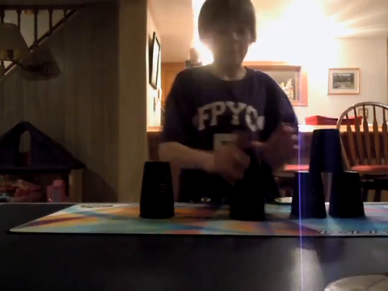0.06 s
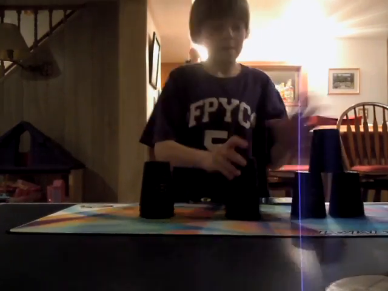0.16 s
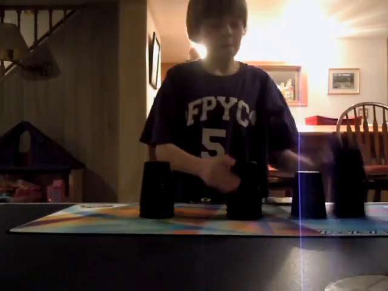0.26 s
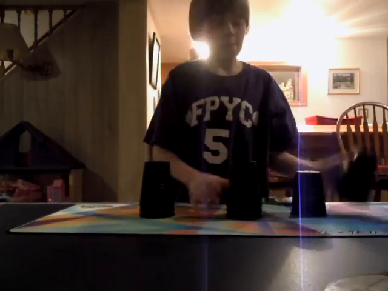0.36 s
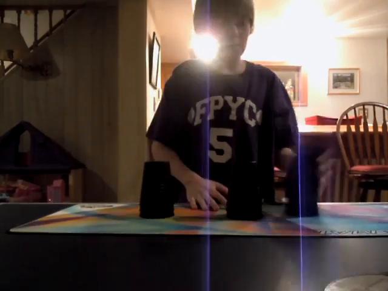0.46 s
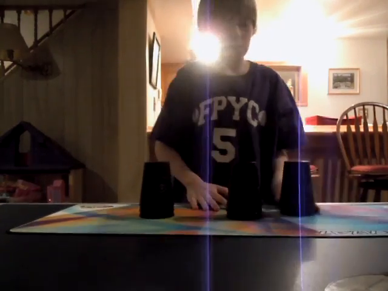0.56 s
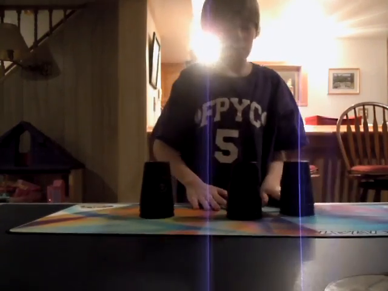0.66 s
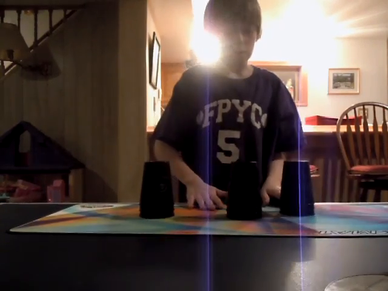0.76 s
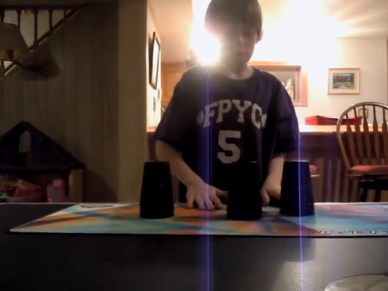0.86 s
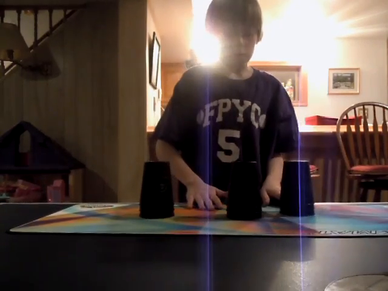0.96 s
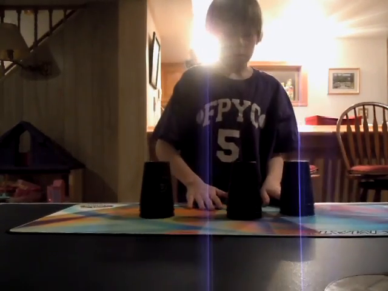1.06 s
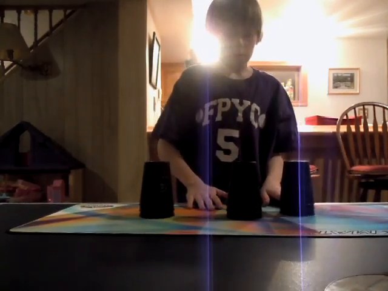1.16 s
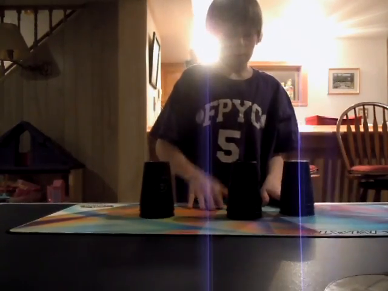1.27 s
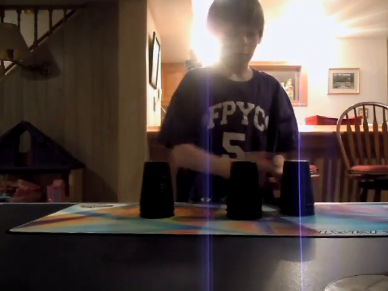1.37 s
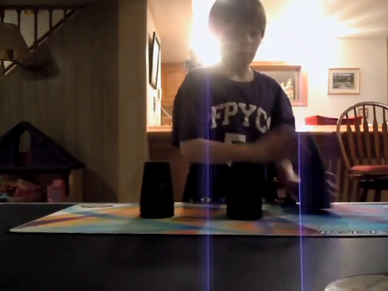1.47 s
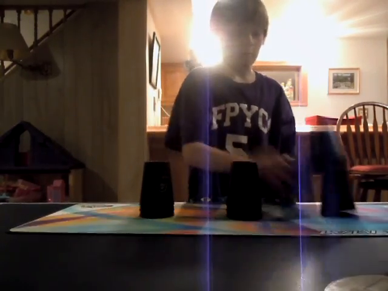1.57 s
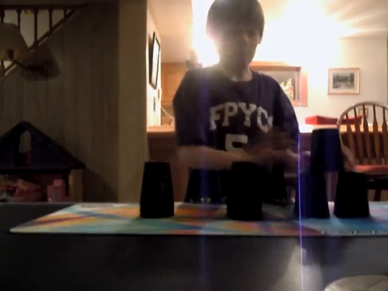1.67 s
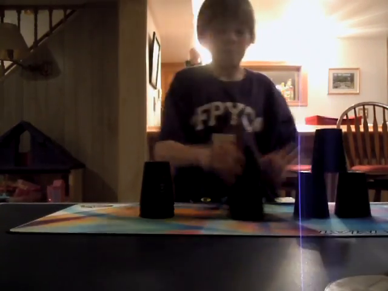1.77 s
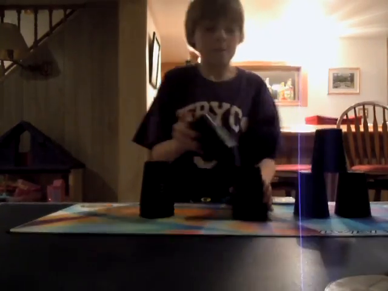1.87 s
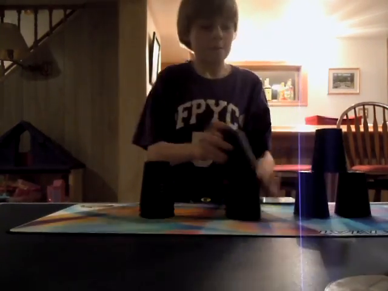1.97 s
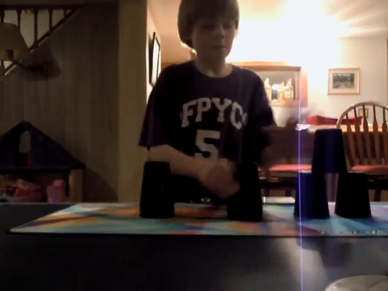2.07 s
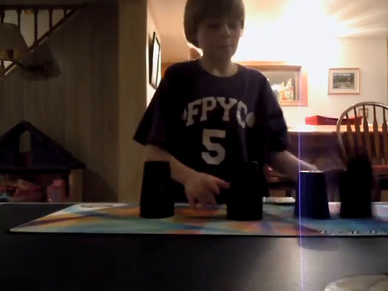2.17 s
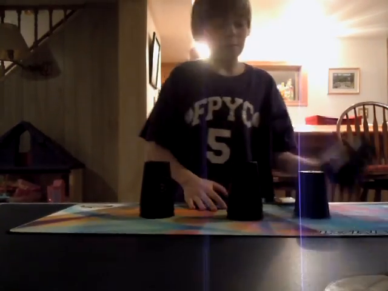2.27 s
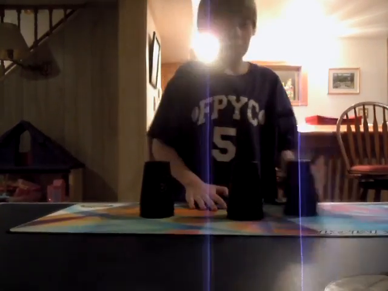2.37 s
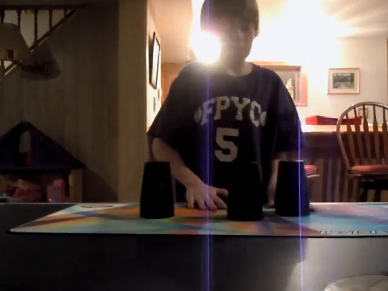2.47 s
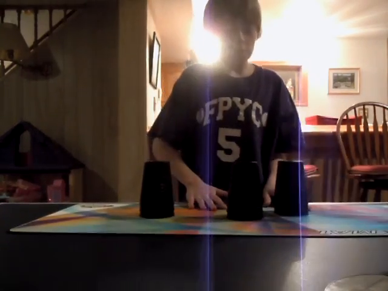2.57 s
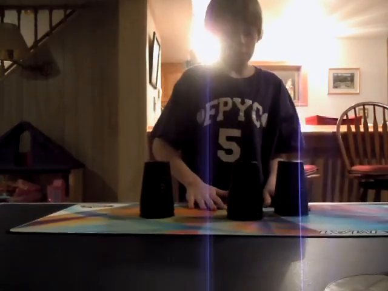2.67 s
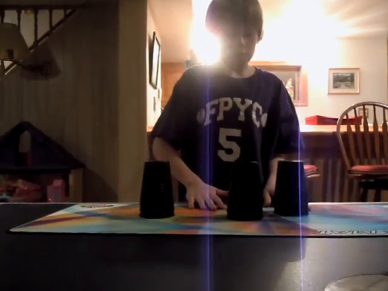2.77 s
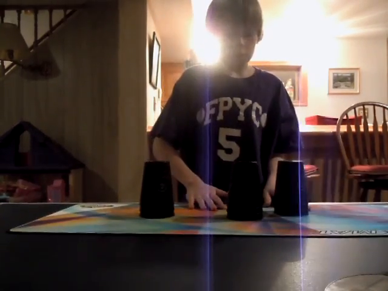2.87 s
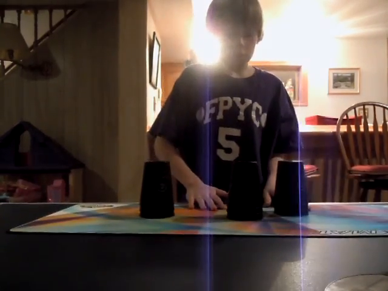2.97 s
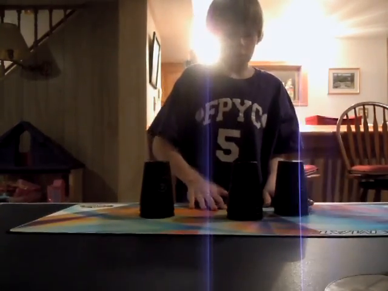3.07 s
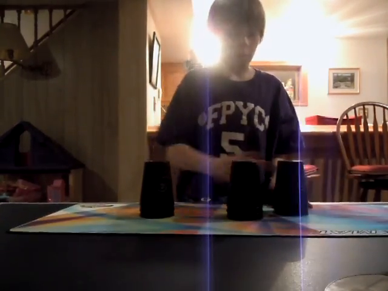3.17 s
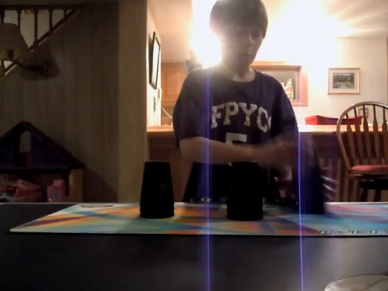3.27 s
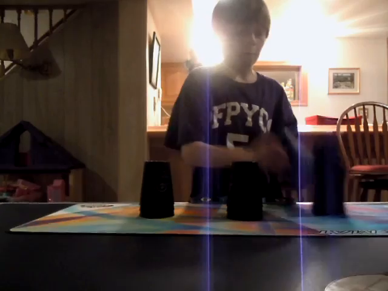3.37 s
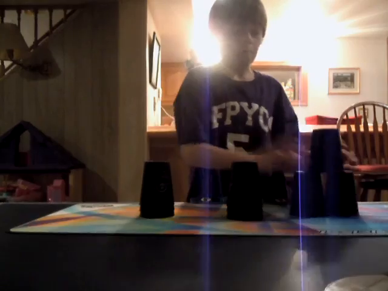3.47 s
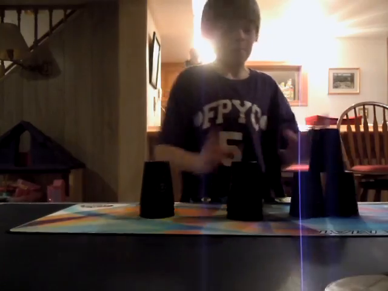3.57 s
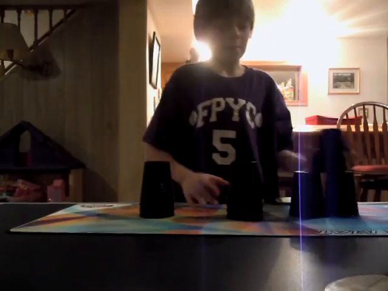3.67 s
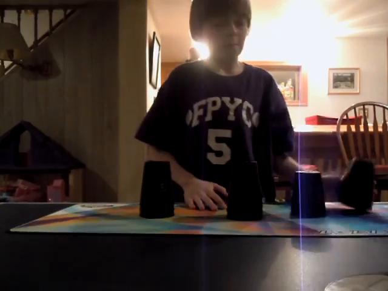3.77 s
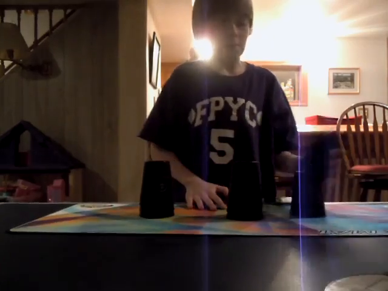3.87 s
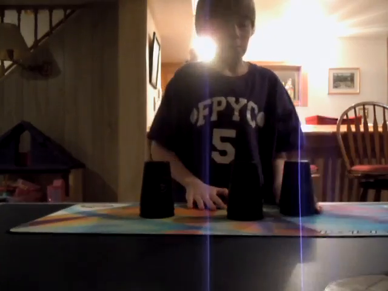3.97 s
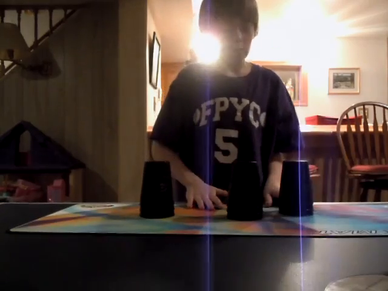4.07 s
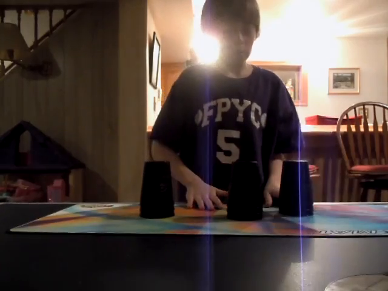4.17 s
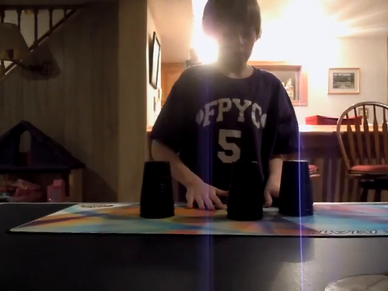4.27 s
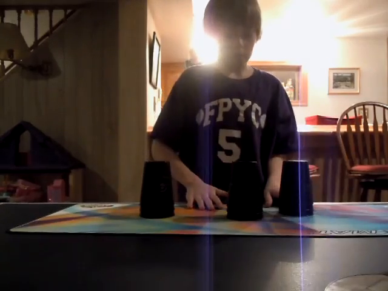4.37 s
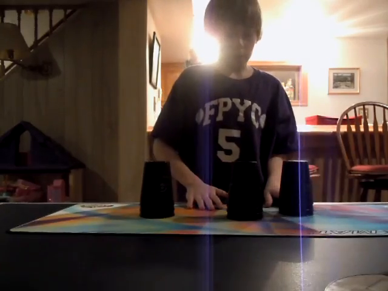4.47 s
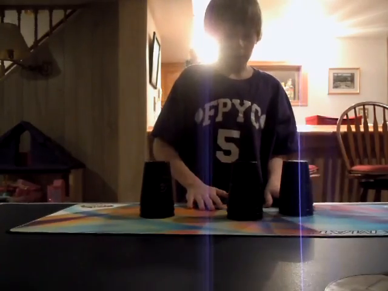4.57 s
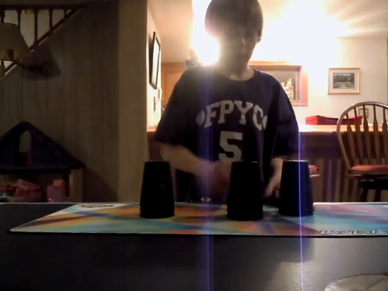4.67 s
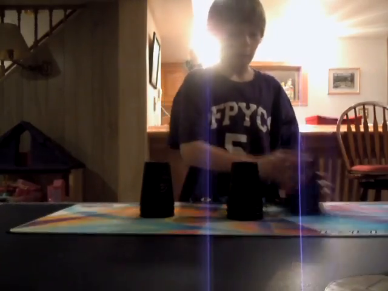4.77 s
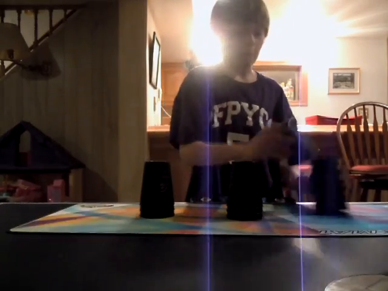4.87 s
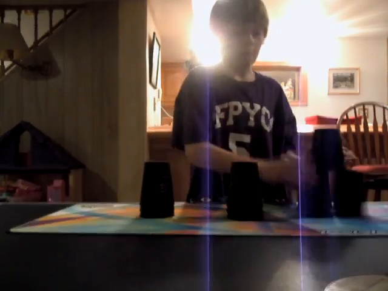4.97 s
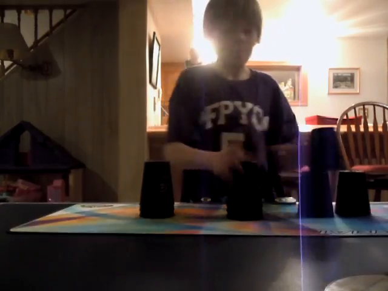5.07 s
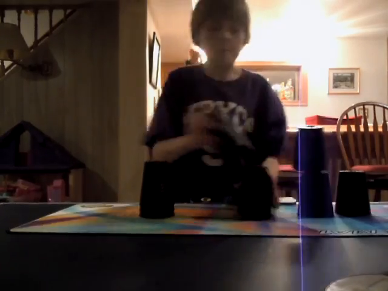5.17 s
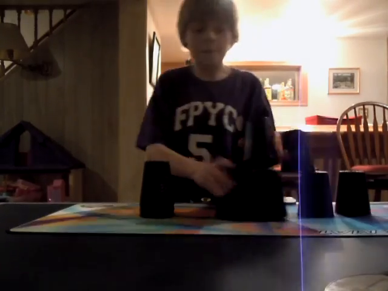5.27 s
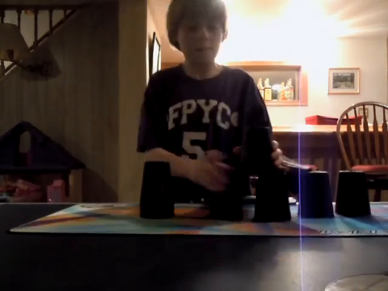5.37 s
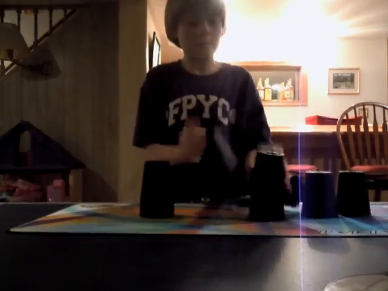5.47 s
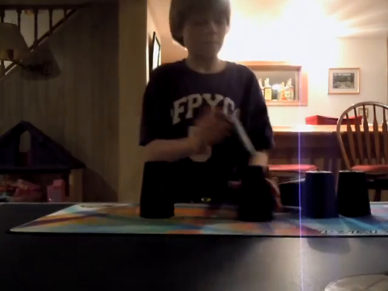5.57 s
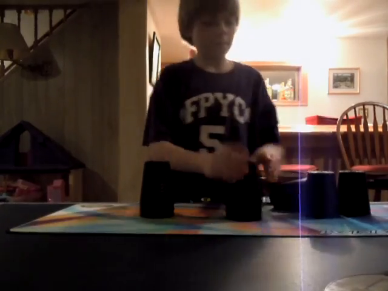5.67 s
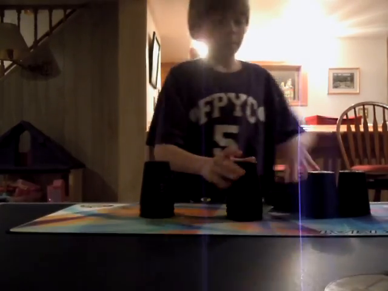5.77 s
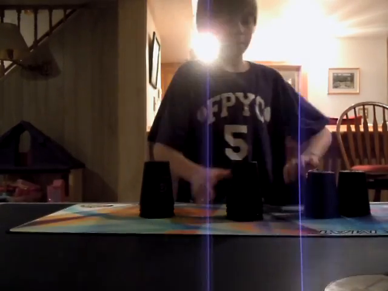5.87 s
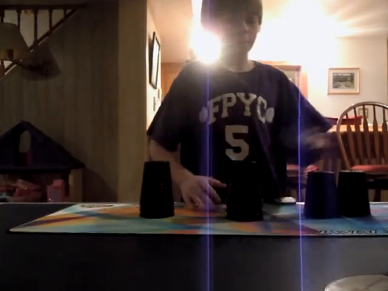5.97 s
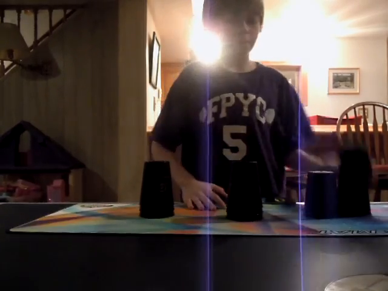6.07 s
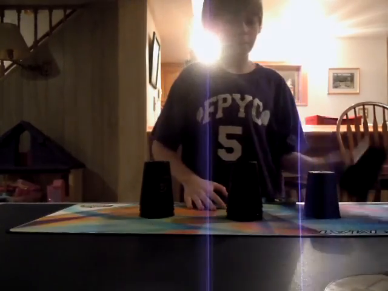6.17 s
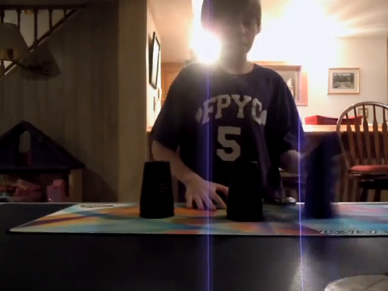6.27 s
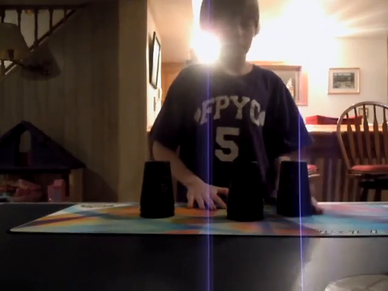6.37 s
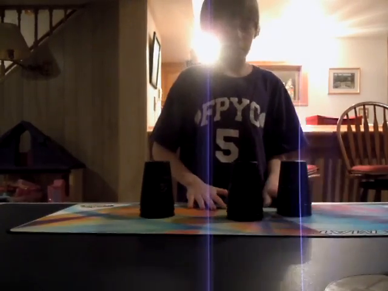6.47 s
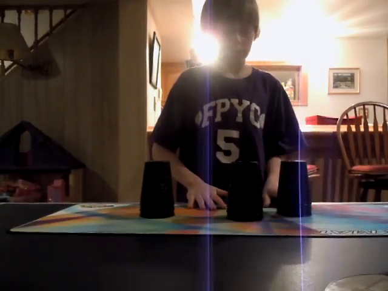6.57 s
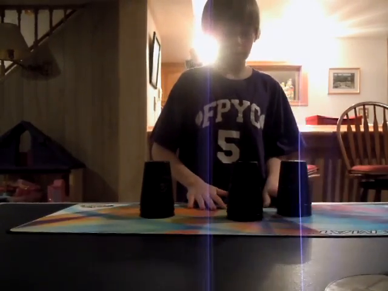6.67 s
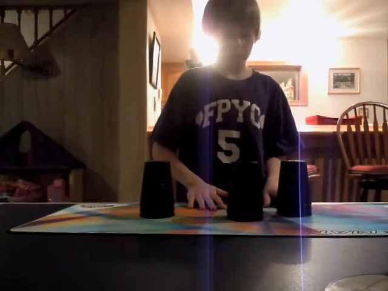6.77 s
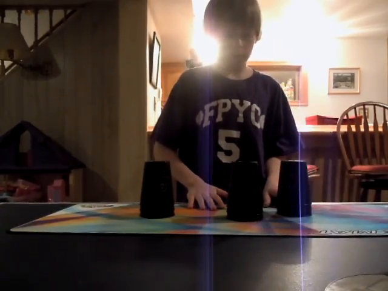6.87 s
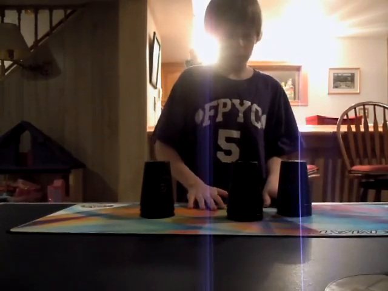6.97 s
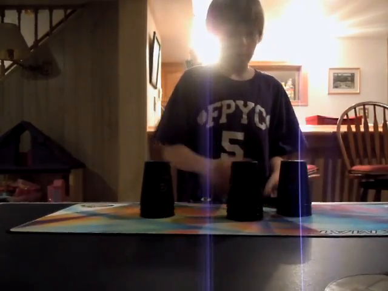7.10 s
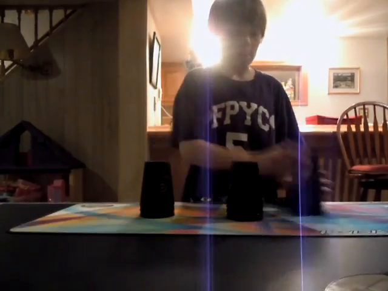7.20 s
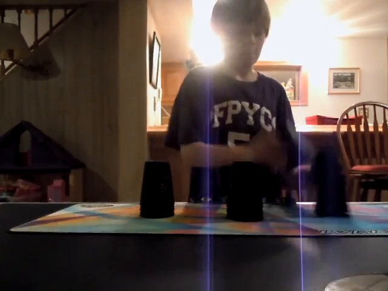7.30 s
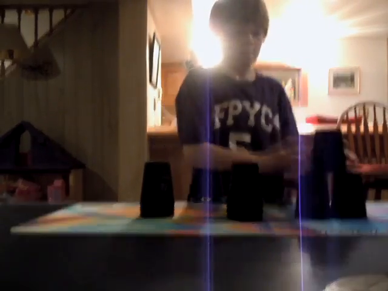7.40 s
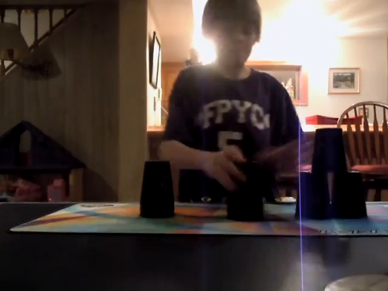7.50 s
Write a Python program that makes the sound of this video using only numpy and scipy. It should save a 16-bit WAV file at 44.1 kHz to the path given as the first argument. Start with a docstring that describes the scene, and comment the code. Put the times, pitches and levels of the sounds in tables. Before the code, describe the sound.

Hard plastic cups are stacked and unstacked in rapid bursts on a table mat, hollow knocks and sharp clacks separated by short near-silent pauses.

```python
"""A living room: on a mat on a table, hard plastic cups are stacked and unstacked in quick bursts.
Each full blow mixes a hollow note of trapped air, a ringing cup wall, a sharp rim crack and a thud in the table.
Cups rub with a noise made of tiny slips, the table sways at a low pitch, and the room adds fading echoes.
A camera stands on the same table, so close that the hardest knocks overload its microphone."""
import sys
import numpy as np
from scipy import signal
from scipy.fft import rfft, irfft, next_fast_len
from scipy.io import wavfile

SR = 44100
rng = np.random.default_rng(int(sys.argv[2]) if len(sys.argv) > 2 else 0)


def materialize(psi):
    """Save the field psi as 16-bit PCM at rate SR to the path in sys.argv[1].

    A 1-D psi becomes a single channel; in a 2-D psi each row is a channel.
    """
    bounded = np.clip(np.atleast_2d(psi).T, -1, 1)
    quanta = np.round(bounded * 32767).astype(np.int16)
    wavfile.write(sys.argv[1], SR, quanta)


N = 332514  # length of the scene in samples
LEAD = SR // 10  # samples made before the scene opens, so that earlier sounds can run into it
TIME = (np.arange(next_fast_len(LEAD + N + 2000)) - LEAD) / SR  # seconds; 0 is the opening
FREQS = np.fft.rfftfreq(len(TIME), 1 / SR)
AGE = np.arange(4096) / SR  # seconds since a blow
ATTACK = 265  # the first 6 ms of a blow, in samples


def amp(db):
    """Turns decibels into a gain."""
    return 10 ** (np.asarray(db) / 20)


def read(points, hz):
    """Reads a table between its rows, along straight lines over log frequency."""
    table_hz, value = np.transpose(points)
    return np.interp(np.log(hz + 1), np.log(table_hz + 1), value)


def unit(x):
    """Scales a sound to an average (rms) strength of 1."""
    return x / np.sqrt(np.mean(x ** 2) + 1e-20)


def struck(x):
    """Scales a blow so that its first 6 ms have an rms of 1."""
    return x / np.sqrt(np.mean(x[:ATTACK] ** 2) + 1e-20)


def add(mix, start_s, sound):
    """Mixes a sound in at a given time."""
    part = mix[max(0, LEAD + round(start_s * SR)):][:len(sound)]
    part += sound[:len(part)]


def colour(x, points):
    """Filters a sound to a given spectrum without smearing it backwards in time (minimum phase)."""
    size = len(AGE)
    hz = abs(np.fft.fftfreq(size, 1 / SR))
    log_gain = np.log(amp(read(points, hz)))
    taps = np.fft.ifft(np.exp(np.conj(signal.hilbert(log_gain)))).real
    return signal.oaconvolve(x, taps[:size // 2])[:len(x)]


def noise(points):
    """Makes steady noise of rms 1 with a given spectrum."""
    return unit(colour(rng.standard_normal(len(TIME)), points))


def ring(hz, t60, rise=0.00036):
    """One pure note that rises quickly, then falls by 60 dB in t60 seconds."""
    return np.sin(2 * np.pi * hz * AGE) * amp(-60 * AGE / t60) * (1 - np.exp(-AGE / rise))


# Colour of the steady hiss: frequency_hz, level_db
HISS_COLOUR = [(150, -29), (700, -38.5), (1800, -17), (4000, -22), (8000, -30), (12000, -32.5),
               (15000, -43)]


def hiss(hiss_db=-73, whine_db=-77, whine_hz=7880, whine_width_hz=60):
    """Faint steady hiss, plus noise in so narrow a band that it is heard as a fuzzy whine."""
    band = np.exp(-.5 * ((FREQS - whine_hz) / whine_width_hz) ** 2)
    whine = unit(irfft(rfft(rng.standard_normal(len(TIME))) * band, len(TIME)))
    return amp(hiss_db) * noise(HISS_COLOUR) + amp(whine_db) * whine


# How long the room rings: frequency_hz, t60_s
ROOM_T60 = [(100, .4), (400, 0.37), (1000, 0.4), (2000, 0.4), (4000, 0.4), (8000, 0.33), (14000, 0.45)]
# How strongly the room answers: frequency_hz, level_db
ROOM_SEND = [(100, 0.5), (400, -9.5), (1000, -8), (2000, -6.5), (4000, -11), (8000, -12.5), (14000, -21)]
# How alike the room tail is on left and right: frequency_hz, likeness (1 = the same)
ROOM_LIKENESS = [(100, .98), (600, .98), (1200, .88), (3000, .8), (8000, .65), (14000, .6)]


def tail(build_s=0.00067):
    """Many mixed echoes: fading noise, nearly alike at both microphone ports, that dies at each pitch's own rate."""
    hz, t, spectra = signal.stft(rng.standard_normal((2, SR * 2 // 3)), SR, nperseg=256)
    same = np.clip(read(ROOM_LIKENESS, hz), -1, 1)[:, None]
    spectra[1] = same * spectra[0] + np.sqrt(1 - same ** 2) * spectra[1]
    t60 = read(ROOM_T60, hz)[:, None]
    even_energy = np.sqrt(2 * np.log(1000) / (t60 * SR))  # a longer tail is not a stronger one
    spectra *= amp(read(ROOM_SEND, hz)[:, None] - 60 * t / t60) * even_energy
    response = signal.istft(spectra, SR, nperseg=256)[1]
    return response * np.minimum(np.arange(response.shape[1]) / (build_s * SR), 1)


def room(x, echo_db=-12, count=3):
    """Direct sound, one ceiling echo and three random tails, faded in turn so that blows do not all share one."""
    delay = SR * (.0068 + .0002 * np.sin(2 * np.pi * 1.3 * TIME))  # about 7 ms, drifting slightly
    source = np.arange(len(x)) - np.round(delay).astype(int)
    out = x + amp(echo_db) * x[np.maximum(source, 0)]
    for k in range(count):
        place = (TIME * 5 + k) % count
        share = np.sin(np.pi / 2 * np.minimum(place, 2))  # fades in and out, then rests
        out = out + signal.oaconvolve((x * share)[None], tail(), axes=1)[:, :len(TIME)]
    return out


# Colour of the rumble: frequency_hz, level_db
RUMBLE_COLOUR = [(12, -11.5), (26, 5), (45, -9), (90, -10), (130, -13), (200, -19), (350, -25), (600, -31),
                 (1200, -36), (4000, -75.5)]
# The table sways after a push: start_s, level_db, pitch_hz, t60_s
SWAYS = [(1.791, -23, 31.18, 0.86), (5.653, -20.5, 27.2, 0.92), (6.385, -17.5, 26.94, 0.55),
         (6.58, -30, 25.7, 0.95)]
# Colour of the juddering table legs: frequency_hz, level_db
JUDDER_COLOUR = [(30, -3.5), (60, -1), (130, -3), (220, -9.5), (450, -24.5), (2000, -35)]


def table(rise=0.014, judder_db=-15, rumble_db=-42.5, rumble_fade_db_per_s=31.5):
    """Low notes for the sway, noise for the legs, and a rumble of arms that shift around moves and rest between."""
    rest_s = np.min([abs(TIME - row[0]) for row in LANDINGS + NESTINGS + BUMPS], axis=0)
    out = amp(rumble_db - rumble_fade_db_per_s * rest_s) * noise(RUMBLE_COLOUR)
    t = np.arange(SR) / SR
    for start_s, db, hz, t60 in SWAYS:
        judder = amp(judder_db) * unit(colour(rng.standard_normal(SR), JUDDER_COLOUR))
        sway = np.sin(2 * np.pi * hz * t)
        add(out, start_s, amp(db - 60 * t / t60) * (1 - np.exp(-t / rise)) * (sway + judder))
    return out


def friction(spread_db):
    """Plastic on plastic: a dense train of tiny slips of uneven size."""
    slips_per_s = 5000
    size = amp(spread_db * np.minimum(rng.exponential(1, len(TIME)), 3))
    slips = rng.random(len(TIME)) < slips_per_s / SR
    return size * rng.standard_normal(len(TIME)) * slips


def stroke(length_s, db):
    """Pressure of one scrape: quick rise, hold, quick release."""
    return amp(db) * signal.windows.tukey(max(2, round(length_s * SR)), .25)


# Nested cups are drawn apart, with one quick pull on the way:
# start_s, pull_s, end_s, level_db (before the pull and the overall slide gain)
LIFTS = [(1.273, 1.47, 2.03, -51), (3.058, 3.29, 3.37, -44), (4.591, 4.843, 4.97, -50.5),
         (7.175, 7.257, 7.55, -46.5)]
# Rims and fingers scrape as loose cups are pushed together; the last, faint row is a soft brush of
# hands on cups: start_s, end_s, level_db
SCRAPES = [(0, 0.238, -40), (1.775, 1.903, -41), (5.279, 5.319, -29), (5.391, 5.708, -45.5),
           (6.085, 6.174, -36.5), (6.164, 6.283, -48), (6.555, 7.213, -57.5)]
# Colour of smooth sliding, shaped by the gap between two cups: frequency_hz, level_db
SLIDE_COLOUR = [(200, -23), (1000, -10.5), (1700, -9), (2450, 2.5), (3500, -12), (4900, -6.5), (5800, -6),
                (7000, 2), (7900, 3), (8500, -6.5), (9500, -2.5), (11000, -17), (14000, -19.5)]
# Colour of a scrape, from the hollow of the cups up to the hiss of the rims: frequency_hz, level_db
SCRAPE_COLOUR = [(150, -8.5), (350, -4), (700, 4), (1100, -5.5), (1500, -21.5), (2500, -10.5), (4300, -13),
                 (6000, -6), (8000, -3), (9300, -9), (11000, -18), (14000, -20)]


def rubbing(slide_gain_db=-1, rise_s=.09, pull_width_s=0.032, pull_db=9.5, graze_s=.035, graze_db=-19):
    """Slip noise swelling with hand speed as nested cups lift, and coarser slips following pressure."""
    speed, pressure = np.zeros((2, len(TIME)))
    for start_s, pull_s, end_s, db in LIFTS:
        surge = np.exp(-.5 * ((TIME - pull_s) / pull_width_s) ** 2)
        fade_in = np.clip((TIME - start_s) / rise_s, 0, 1)
        speed += amp(db + pull_db * surge) * fade_in * (TIME < end_s)
    for start_s, end_s, db in SCRAPES:
        add(pressure, start_s, stroke(end_s - start_s, db))
    for seated_s, *_, length_s, db in NESTINGS:
        add(pressure, seated_s - length_s, stroke(length_s, db))
    for start_s, db, *_ in CLACKS:  # rims graze each other after a clack
        add(pressure, start_s, stroke(graze_s, db + graze_db))
    slide = unit(colour(friction(spread_db=1.0), SLIDE_COLOUR))
    scrape = unit(colour(friction(spread_db=5), SCRAPE_COLOUR))
    return amp(slide_gain_db) * speed * slide + pressure * scrape


# Colour of a thud through mat and table: frequency_hz, level_db
THUD_COLOUR = [(25, -23.5), (60, -3), (110, -11.5), (180, 0.5), (260, -2), (350, -0.5), (520, -4.5),
               (900, -9.5), (2000, -24.5)]
# Notes of the table top, levels relative to each other: pitch_hz, level_db, t60_s
TABLE_TOP = [(159, -3, 0.024), (234, -2.5, 0.24), (350, -15, 0.099), (371, -3.5, 0.54), (544.3, -9.5, 0.18)]


def thud(shudder=0.07, t60=0.036, top_db=-14):
    """A push on the mat: one sharp pulse with a noisy shudder, while the table top rings under it."""
    push = shudder * rng.standard_normal(len(AGE)) * amp(-60 * AGE / t60)
    push[0] += 1
    top = sum(amp(db) * ring(hz, decay, rise=0.0015) for hz, db, decay in TABLE_TOP)
    fade_out = 1 - (AGE / AGE[-1]) ** 2
    return struck(colour(push, THUD_COLOUR)) + amp(top_db) * top * fade_out


def hollow(hz, cycles=14, upper_db=-8, lower_db=-9):
    """The air in the struck cup rings, and with it the air in its neighbours."""
    air = ring(hz, cycles / hz, rise=0.00044)
    for ratio, db in ((1.1, upper_db), (.88, lower_db)):
        neighbour_hz = hz * ratio * rng.uniform(.97, 1.03)
        air = air + rng.choice([-1, 1]) * amp(db) * ring(neighbour_hz, cycles / hz)
    return struck(air)


def standing(air_hz, hz=1015, db=-19, t60=0.39, best_hz=900, octaves=0.29):
    """A single cup left mouth down holds its note; the higher knocks of nested cups hardly stir it."""
    t = np.arange(SR // 3) / SR
    nearness = np.exp(-.5 * (np.log2(air_hz / best_hz) / octaves) ** 2)
    pitch_hz = hz * rng.uniform(.97, 1.03)
    return nearness * amp(db - 60 * t / t60) * np.sin(2 * np.pi * pitch_hz * t)


# Notes of the cup wall, before each blow varies them and shortens their ring: pitch_hz, level_db, t60_s
WALL_MODES = [(2000, -13, 0.013), (2120, -10.5, 0.028), (2370, -4, 0.07), (2502, 2, 0.025),
              (2677, -2, 0.054), (2930, -3.5, 0.027), (3540, -5.5, 0.0068), (3420, -8.5, 0.0049),
              (3870, 0.5, 0.05), (4030, -14, 0.011), (4985, 10.5, 0.014), (5800, -8.5, 0.0057)]
# Colour of the many overlapping notes of a stack of cups: frequency_hz, level_db
CLATTER_COLOUR = [(400, -25.5), (1100, -10.5), (1800, -2), (3000, 1), (4000, 3.5), (5200, 4), (7000, 2),
                  (14000, -33)]


def wall(focus_hz, focus_db=8, octaves=.14, scatter_db=2.5, clatter_db=0, clatter_t60=0.036, sustain=0.85):
    """Wall notes, weighted by where the cup is struck and detuned by the grip, amid a stack's noisy clatter."""
    modes = np.zeros(len(AGE))
    for (hz, db, t60), (size, shift, side) in zip(WALL_MODES, rng.standard_normal((len(WALL_MODES), 3))):
        favour_db = focus_db * np.exp(-.5 * (np.log2(hz / focus_hz) / octaves) ** 2)
        gripped_hz = hz * (1 + .028 * shift)
        gain = np.sign(side) * amp(db + favour_db + scatter_db * size)
        modes += gain * ring(gripped_hz, t60 * sustain, rise=0.0015)
    clatter = colour(rng.standard_normal(len(AGE)) * amp(-60 * AGE / clatter_t60), CLATTER_COLOUR)
    return struck(struck(modes) + amp(clatter_db) * struck(clatter))


# Colour of a rim crack: frequency_hz, level_db
CRACK_COLOUR = [(300, -16.5), (1200, -2.5), (2500, -6.5), (4300, -17), (5800, -8), (6900, 1.5), (8100, 6),
                (9200, -2), (11000, -9.5), (14000, -23)]


def crack(t60=0.013, chatter_db=-19, chatter_t60=0.061, snap=3.0):
    """Hard rims meet: a snap and a very short noise burst, then faint chatter as they settle."""
    fade = amp(-60 * AGE / t60) + amp(chatter_db - 60 * AGE / chatter_t60)
    contact = rng.standard_normal(len(AGE)) * fade
    contact[0] = snap
    return struck(colour(contact, CRACK_COLOUR))


def knock(thud_db, air_db, air_hz, wall_db, wall_ring, crack_db):
    """A full blow sounds the table, the enclosed air, the cup wall and the rim."""
    out = amp(air_db) * standing(air_hz)
    blow = amp(thud_db) * thud() + amp(air_db) * hollow(air_hz)
    blow += amp(wall_db) * wall_ring + amp(crack_db) * crack()
    out[:len(AGE)] += blow
    return out


# Light touches of rims and fingers: start_s, level_db (of the rim crack)
TICKS = [(0.0987, -35), (0.1362, -28), (0.1818, -27.5), (0.4903, -26), (1.4935, -36), (1.5565, -38),
         (2.0128, -34.5), (2.1901, -22.5), (2.215, -23), (2.3837, -31), (3.3064, -31.5), (3.332, -30.5),
         (3.7329, -29.5), (3.7556, -33), (4.408, -66), (4.9036, -35), (5.1709, -28.5), (5.5073, -30.5),
         (5.6388, -28.5), (5.6505, -28), (5.8687, -48.5), (6.0913, -25.5), (6.1152, -23.5), (6.9935, -49.5),
         (7.1248, -48), (7.2324, -32.5), (7.2599, -29), (7.2752, -30.5), (7.331, -35.5)]


def tick(db, wall_db=-8):
    """A light touch sounds only rim and wall."""
    focus_hz = rng.uniform(2500, 4000)
    return amp(db) * crack(t60=0.0051) + amp(db + wall_db) * wall(focus_hz)


# A gripped stack bumps the mat: start_s, level_db (of the thud)
BUMPS = [(0.056, -26), (0.5, -27.5), (1.4336, -25.5), (1.849, -20.5), (1.9458, -35.5), (3.2449, -23.5),
         (3.903, -29), (4.7775, -25.5), (4.9442, -31), (5.2852, -24.5), (6.3346, -23), (6.37, -26),
         (7.2008, -26)]
# Colour of the scuff of a bumped stack over the mat: frequency_hz, level_db
SCUFF_COLOUR = [(60, -5.5), (120, -7.5), (200, -8.5), (330, 2), (600, -3.5), (1100, -11), (3000, -27)]


def bump(db, air_db=-10, air_hz=430, wall_db=-17, crack_db=-6, scuff_db=-12, scuff_t60=0.32):
    """Mostly thud, then a dull scuff of fading noise on the mat: the hand muffles the cups."""
    pitch_hz = air_hz * rng.uniform(.8, 1.2)
    wall_ring = wall(focus_hz=2450, focus_db=5.5)
    out = knock(db, db + air_db, pitch_hz, db + wall_db, wall_ring, db + crack_db)
    t = np.arange(len(out)) / SR
    scuff = unit(colour(rng.standard_normal(len(out)), SCUFF_COLOUR))
    return out + amp(db + scuff_db - 60 * t / scuff_t60) * scuff


# A cup slides down over another and seats: seated_s, crack_db, air_pop_db, air_pitch_hz, wall_db,
# favoured_wall_pitch_hz, slide_length_s (just before seating), slide_db
NESTINGS = [(0.3376, -8.5, -13.5, 710, -9.5, 1921, 0.068, -25),
            (0.5279, -13.5, -13.5, 1462, -15.5, 3860, 0.035, -27),
            (2.0759, -17.5, -15.5, 1392, -18.5, 2950, .02, -49),
            (2.2242, -15.5, -25, 1767, -18.5, 4050, 0.061, -35.5),
            (2.4053, -18, -18, 1461, -18.5, 2200, 0.017, -37.5),
            (3.789, -16.5, -19.5, 1780, -11.5, 2650, 0.095, -33.5),
            (3.9535, -19, -16, 1510, -20, 3960, 0.035, -33),
            (5.5505, -19, -29, 1682, -18, 2500, 0.036, -39.5),
            (5.6975, -19.5, -28.5, 1364, -28, 2150, 0.088, -46),
            (6.3467, -9.5, -10, 1580, -15.5, 3950, 0.048, -30)]


def nesting(crack_db, air_db, air_hz, wall_db, focus_hz, slide_length_s, slide_db, low_t60=.1, low_db=-20):
    """The walls slap together, with a faint low note added; the trapped air pops and pushes on the table."""
    walls = wall(focus_hz, focus_db=10, octaves=0.13, clatter_db=-0.5, sustain=0.73)
    low_hz = slide_db  # the pitch number is simply taken from slide_db; its minus only flips the wave
    walls = walls + amp(low_db) * ring(low_hz, low_t60)
    thud_db = air_db + slide_length_s  # as strong as the pop; the length number adds under 0.1 dB
    return knock(thud_db, air_db, air_hz, wall_db, walls, crack_db)


# Cup strikes cup: start_s, crack_db, wall_db, air_pitch_hz
CLACKS = [(0.2915, -15.5, -28, 925), (0.309, -27, -31, 1026), (0.323, -27, -24.5, 1120),
          (0.3445, -18, -15, 645), (0.4799, -20, -32, 820), (1.6426, -16, -22, 771), (1.6571, -8, -13, 810),
          (1.659, -8, -19, 840), (1.6685, -14, -9.5, 690), (2.0725, -22.5, -41, 1560),
          (2.1535, -30, -41.5, 808), (2.36, -30, -42.5, 640), (3.4618, -11.5, -27, 879),
          (3.4686, -9.5, -12, 895), (3.473, -12.5, -17.5, 926), (3.7791, -24.5, -25, 853),
          (4.8169, -28, -32, 665), (4.8554, -29.5, -46, 711), (4.9847, -19.5, -20.5, 790),
          (4.9969, -4.5, -10, 830), (5.004, -9, -14.5, 890), (5.3222, -6.5, -11, 981),
          (6.3003, -18.5, -29, 592), (7.4085, -10, -11.5, 891), (7.4139, -6.5, -8.5, 893)]
# Which wall notes a clack favours, by its strength: crack_db, favoured_wall_pitch_hz
CONTACT = [(-25, 5300), (-17.5, 8400), (-13.5, 4900)]


def clack(db, wall_db, air_hz, thud_db=-11, air_db=-4.5):
    """Mostly rim; a square blow also rings the wall, a glancing one hardly does."""
    focus_hz = np.interp(db, *np.transpose(CONTACT))
    return knock(db + thud_db, db + air_db, air_hz, wall_db, wall(focus_hz, focus_db=13), db)


# A cup lands mouth down on the mat: start_s, hollow_knock_db, air_pitch_hz, crack_db
LANDINGS = [(-0.035, -1, 893, -9), (0.0317, -25.5, 920, -55), (0.2539, -20.5, 1107, -31.5),
            (0.262, -22, 960, -40), (1.6223, -2, 673.5, -26), (1.6645, -4, 733, -14),
            (1.83, -27.5, 833, -24), (3.3779, -9.5, 822, -15), (3.4466, -7.5, 730, -28.5),
            (4.9751, -11, 706, -36), (5.0098, -15.5, 765, -22.5), (5.0156, -11.5, 630, -11.5),
            (5.1837, -18, 1014, -21), (5.3156, -22, 940, -29), (5.3258, -6.5, 930, -17.5),
            (5.4202, -29, 920, -40), (5.4758, -25, 818, -34), (7.396, -11.5, 667, -29.5),
            (7.4212, -9.5, 930, -16.5), (7.43, -13.5, 680, -18.5)]


def landing(db, air_hz, crack_db, thud_db=-11, wall_db=-3):
    """Mostly air: the thud's level follows the hollow knock, the wall's level follows the rim."""
    wall_ring = wall(focus_hz=3850, focus_db=4)
    return knock(db + thud_db, db, air_hz, crack_db + wall_db, wall_ring, crack_db)


def cups():
    """Plays every blow at its time."""
    out = np.zeros(len(TIME))
    blows = ((LANDINGS, landing), (CLACKS, clack), (NESTINGS, nesting), (BUMPS, bump), (TICKS, tick))
    for rows, sound in blows:
        for start_s, *how in rows:
            add(out, start_s, sound(*how))
    return out


# How far the left port leads: frequency_hz, phase_radians
PORT_PHASE = [(50, 0), (700, -.02), (3000, -.2), (6500, -.4), (8700, -.68), (11300, -.6), (14000, -.4)]
# How much louder the left port is: frequency_hz, left_minus_right_db
PORT_BALANCE = [(30, 3), (70, .8), (200, 0), (700, 0), (1400, -.6), (3000, -.8), (8000, .6), (14000, -.6)]


def scene(apart_hiss_db=-75, apart_rumble_db=-60):
    """Cups and table in the room, heard by two closely spaced microphone ports."""
    sound = room(cups() + rubbing()) + table() + hiss()
    side = np.array([[.5], [-.5]])  # each port takes half of every left-right difference
    ports = amp(side * read(PORT_BALANCE, FREQS)) * np.exp(1j * side * read(PORT_PHASE, FREQS))
    # background noise with opposite sign in the two ports
    apart = amp(apart_hiss_db) * noise(HISS_COLOUR) + amp(apart_rumble_db) * noise(RUMBLE_COLOUR)
    heard = irfft(rfft(sound) * ports, len(TIME)) + 2 * side * apart
    return heard[:, LEAD:LEAD + N]


def record(dry, edge_hz=14500):
    """The hardest knocks overload, flattened towards full scale; then the highest treble is cut."""
    clipped = dry / (1 + dry ** 8) ** (1 / 8)
    low_pass = signal.firwin(255, edge_hz, window=("kaiser", 8), fs=SR)
    return signal.oaconvolve(clipped, low_pass[None], "same")


dry = scene()
out = record(dry)
materialize(out)
```